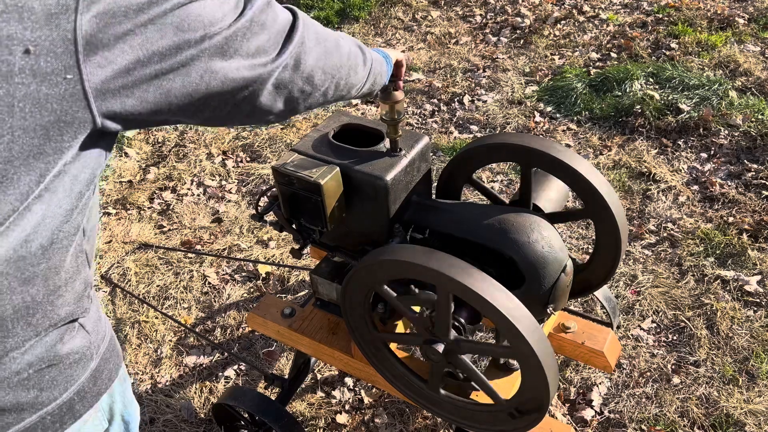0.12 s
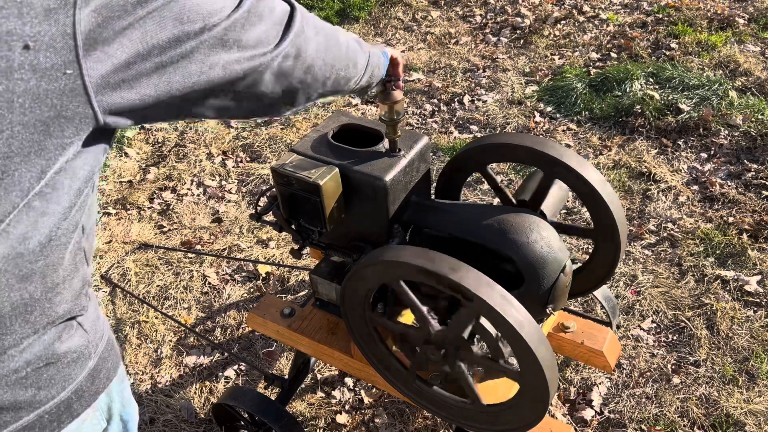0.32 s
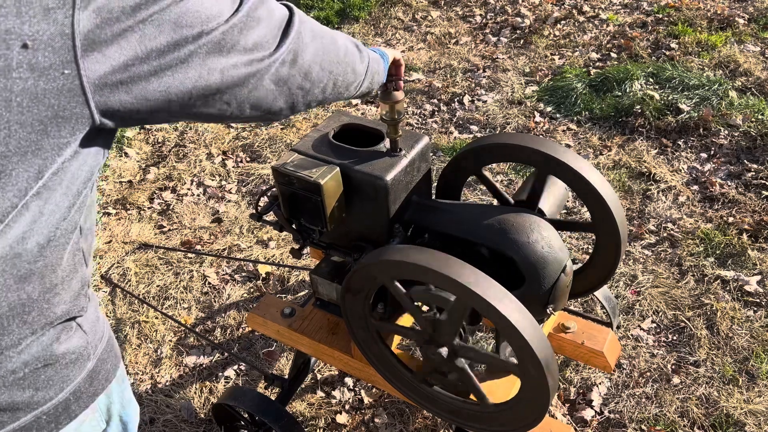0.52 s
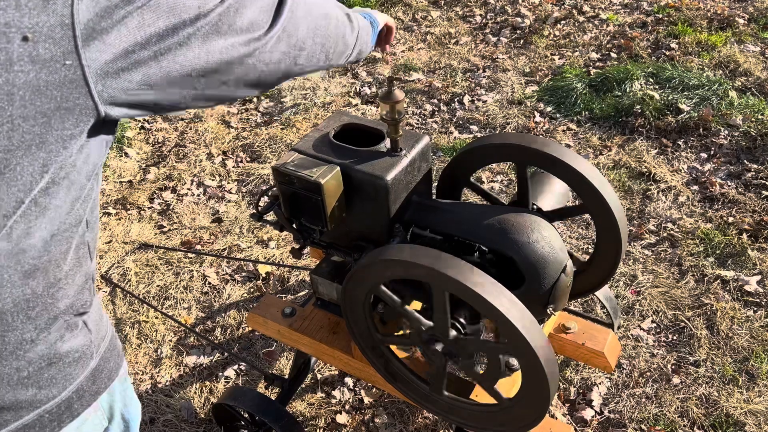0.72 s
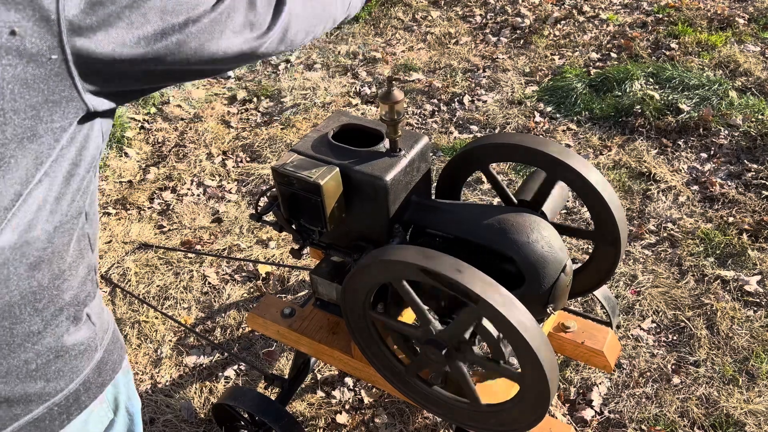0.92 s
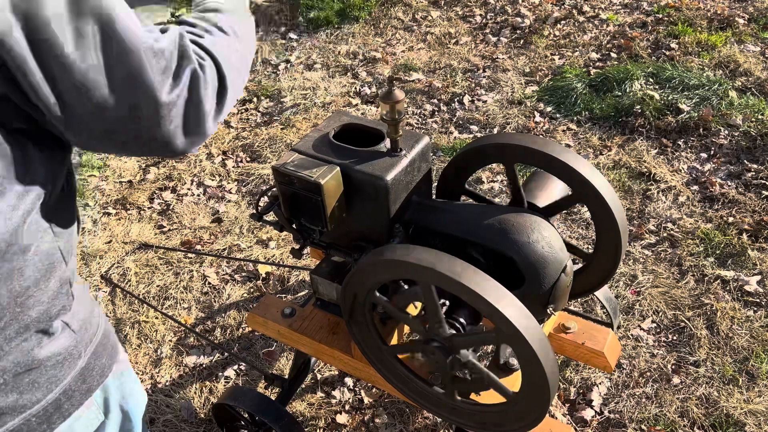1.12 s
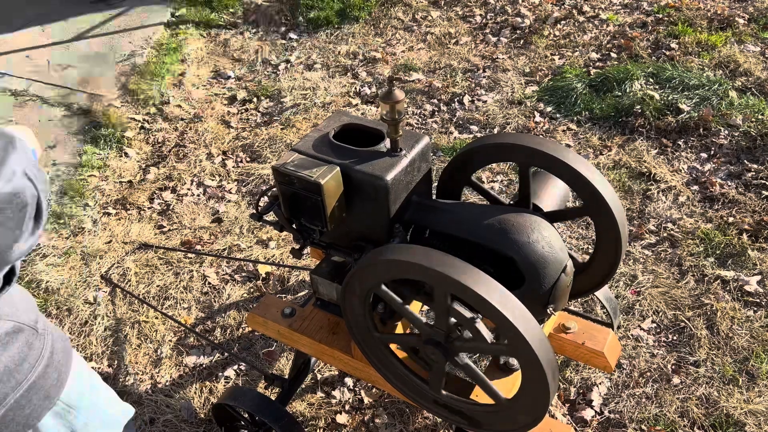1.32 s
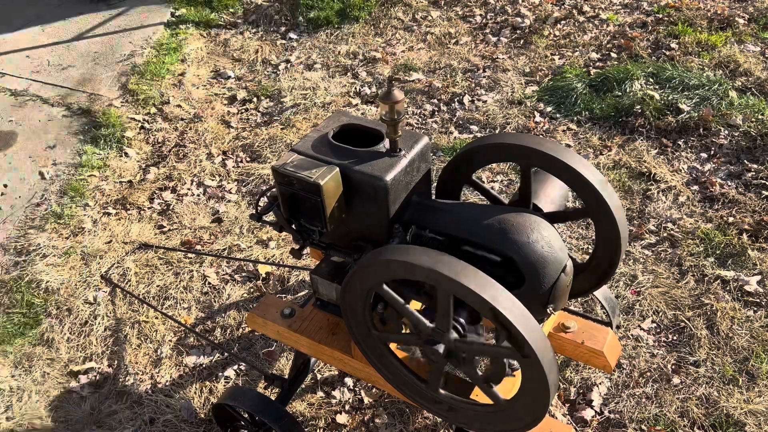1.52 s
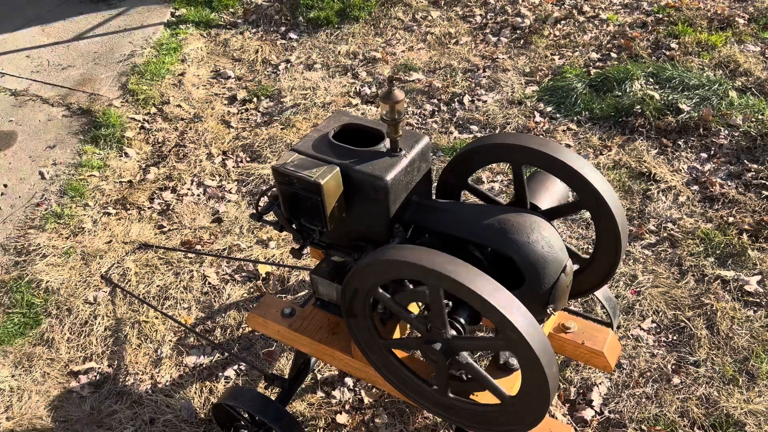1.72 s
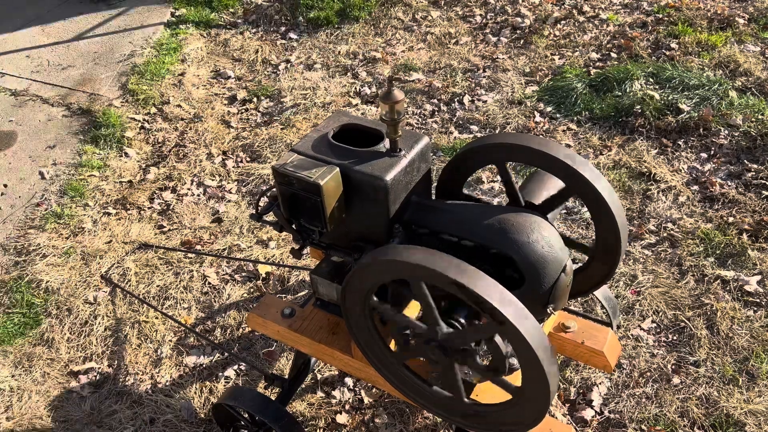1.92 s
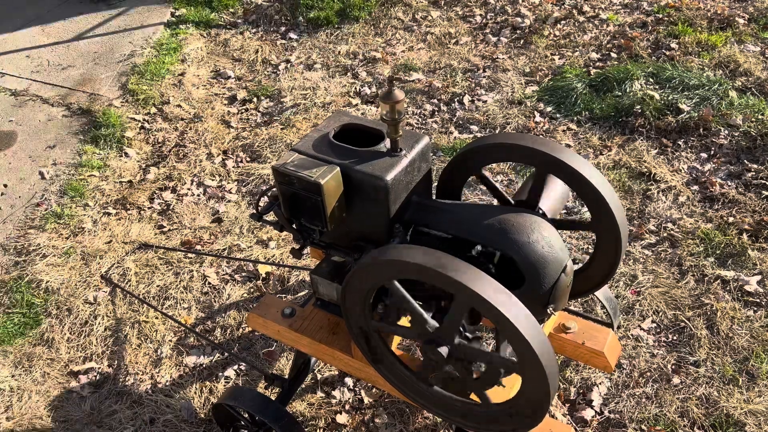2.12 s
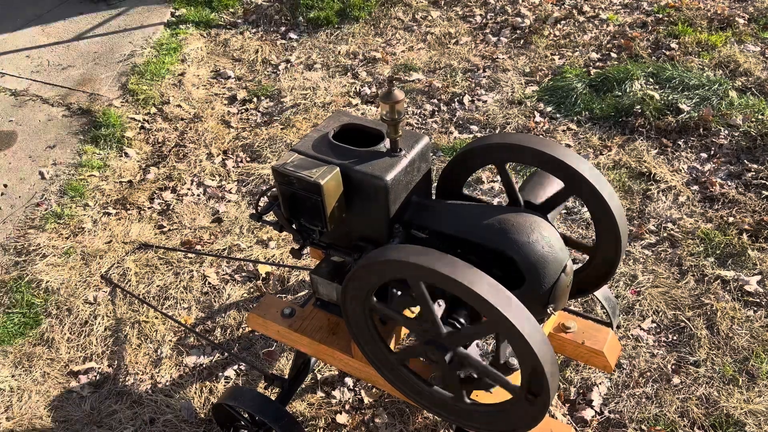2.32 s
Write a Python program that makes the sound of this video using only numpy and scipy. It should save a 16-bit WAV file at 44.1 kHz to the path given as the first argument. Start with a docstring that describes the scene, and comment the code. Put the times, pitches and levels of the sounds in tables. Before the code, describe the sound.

A small old single-cylinder engine runs outdoors, close to the microphone. It starts with an iron clatter, a gulp of air and a hiss, then fires one loud, sharp pop at about 0.3 seconds. From 0.4 seconds it coasts, with much quieter clatters, knocks, ticks and air puffs about four times a second over a faint whirr. After 1.6 seconds these grow softer and duller until about 2.4 seconds.

```python
"""A clatter of iron, a gulp of air, a hiss of compression, then one sharp, spitting pop: a small
hit-and-miss engine in an open yard, the microphone close above it. It coasts on at four turns a second:
gears and rod clatter and knock, air puffs through the open valve and the governor latch ticks, while
the treble dulls. Behind it are the whirr of the bearings, faint echoes and light wind on the microphone."""
import sys
import numpy as np
from scipy import signal
from scipy.io import wavfile
from scipy.ndimage import uniform_filter1d

SR = 44100
rng = np.random.default_rng(int(sys.argv[2]) if len(sys.argv) > 2 else 0)


def dump_mix(stems):
    """Bounce the given channels to the path in sys.argv[1] as a 16-bit WAV at rate SR."""
    frames = np.atleast_2d(stems).T  # one column per channel
    limited = np.clip(frames, -1, 1)  # hard clip at full scale
    pcm = np.round(limited * 32767).astype(np.int16)
    wavfile.write(sys.argv[1], SR, pcm)


N = 105840
TIME = np.arange(N) / SR

# gas flows of the working stroke (t/s, level/dB)
INTAKE_FLOW = [(.075, -79.5), (.1, -41.5), (.116, -36), (.125, -24), (.134, -30), (.15, -28.5), (.167, -45),
               (.2, -73)]
LEAK_FLOW = [(.16, -50), (.172, -35), (.2, -36), (.212, -31), (.216, -22), (.224, -23), (.229, -13),
             (.236, -14), (.244, -24), (.262, -38), (.275, -55)]
BLAST_FLOW = [(.263, -48.5), (.268, -23), (.274, -18), (.279, -8), (.286, -15), (.291, -20.5), (.31, -30.5),
              (.327, -35), (.345, -46), (.38, -53), (.42, -83)]
EXHAUST_FLOW = [(.264, -47), (.272, -27), (.28, -39), (.285, -20), (.292, -25), (.309, -32.5), (.322, -31),
                (.34, -41), (.37, -50.5), (.41, -70)]
# spectra of the moving gas at close range (f/Hz, relative level/dB)
INTAKE_SPECTRUM = [(40, 9), (130, 1.5), (250, 6.5), (900, -14.5), (1400, -6), (2000, 3.5), (3200, -8),
                   (4600, 3.5), (5300, -2.5), (6500, -3), (10000, -1.5), (13000, -1.5), (16000, -7.5)]
LEAK_SPECTRUM = [(100, -21), (500, -13.5), (750, -4), (1300, -4), (1850, 2.5), (2500, 4.5), (3100, -7.5),
                 (4100, 2.5), (5000, -6.5), (6400, 2.5), (7500, 0), (10200, 4), (13000, 1.5), (16000, -4)]
BLAST_SPECTRUM = [(200, -37.5), (1000, -1), (2200, -22), (3000, -13.5), (3800, -8.5), (4800, -12.5),
                  (6500, -5.5), (7500, -15.5), (9000, -3.5), (12000, -2.5), (13500, -5.5), (14500, -3.5),
                  (16000, -12)]
EXHAUST_SPECTRUM = [(30, -1.5), (110, 1), (210, -2.5), (400, -8), (650, 6), (850, -4), (1030, 3.5),
                    (1300, -5), (1700, 1.5), (2200, 2.5), (2900, -11.5), (3700, -6.5), (6000, -34),
                    (16000, -46.5)]
PUFF_SPECTRUM = [(60, -23), (180, -20), (300, 5.5), (420, -3), (530, 3.5), (700, -6.5), (1000, -12),
                 (1500, -26.5), (2500, -28), (4000, -35.5), (16000, -65)]
RUMBLE_SPECTRUM = [(20, -6), (50, 2), (100, -8), (160, -4), (300, -27), (1000, -59.5)]
VALVE_SPECTRUM = [(1000, -31), (2700, -2.5), (3600, -1), (5300, -12), (6500, 5.5), (9000, 8),
                  (11000, 5.5), (16000, -1)]
# pressure steps: intake valve flutter, ignition, exhaust, after-beats (t/s, level/dB, f/Hz, t60/s)
THUMPS = [(.068, -39, 300, 0.11), (.088, -33, 354, 0.1), (.107, -28.5, 449, 0.045),
          (0.123, -31, 472, 0.053), (.171, -42, 260, .1), (.2668, -14.5, 510, .011),
          (.283, -11, 604, 0.042), (.288, -22.5, 405, 0.092), (.313, -23, 410, 0.046),
          (0.322, -25, 320, 0.053)]
# gear and rod clatter, once a turn (t/s, rattle/dB, casting ring/dB, body hum/dB)
CLATTERS = [(.010, -38.5, -37.5, -39.5), (0.499, -46.5, -45, -40.5), (0.737, -39, -44.5, -42.5),
            (0.972, -46.5, -49, -40.5), (1.213, -41.5, -44.5, -37), (1.46, -39, -41.5, -44),
            (1.711, -47.5, -53, -49), (1.966, -47.5, -54, -48.5), (2.232, -48, -55.5, -63)]
# knocks of the rod bearing (t/s, level/dB)
KNOCKS = [(0.058, -44), (.548, -40.5), (.779, -35), (1.017, -42.5), (1.26, -41), (1.506, -35.5),
          (1.761, -41.5), (2.015, -43), (2.038, -49), (2.277, -44.5), (2.298, -60)]
# loose iron parts singing out (t/s, level/dB, f/Hz, t60/s)
PART_RINGS = [(.03, -38, 1610, 0.14), (0.997, -38, 1215, 0.15), (.779, -50, 4950, 0.16),
              (.893, -47, 6230, 0.18), (1.256, -43.5, 4820, 0.079), (1.382, -52.5, 4460, 0.088),
              (1.466, -47, 2790, 0.12), (1.491, -40.5, 4820, .14), (1.527, -47, 1204, .08),
              (1.581, -47.5, 2010, 0.13), (1.718, -46, 1780, 0.11), (1.724, -46.5, 4860, .12),
              (1.775, -64, 3360, 0.23), (1.888, -58, 6200, .14), (1.975, -55, 3450, 0.28),
              (2.117, -62, 3150, .25), (2.236, -45, 3926, 0.11), (2.278, -47.5, 1414, 0.05)]
# air through the open valve (peak t/s, level/dB, hollow tone f/Hz, whistle/dB)
PUFFS = [(0.444, -42.5, 485.3, -47.5), (0.669, -38, 312.9, -44), (0.907, -37.5, 645, -44),
         (1.145, -39.5, 320.4, -48.5), (1.395, -39, 338.3, -50.5), (1.646, -43, 323.8, -50.5),
         (1.897, -45, 330, -54), (2.158, -49.5, 442.6, -57.5)]
# whistles of the valve (f/Hz, width/Hz, relative level/dB)
VALVE_WHISTLES = [(4840, 92, -13), (6230, 180, -9.5), (6620, 94, -14), (7350, 360, -10.5),
                  (9810, 150, -5.5), (10500, 73, -16), (12500, 320, -11.5)]
# governor latch and push rod (t/s, scrape/dB, ring/dB)
TICKS = [(0.377, -48, -49.5), (.492, -41.5, -53), (0.607, -46.5, -54), (.724, -43, -54), (.841, -46.5, -63),
         (.960, -45.5, -48.5), (1.079, -51.5, -58), (1.2, -52.5, -69), (1.323, -55, -58), (1.446, -45, -50),
         (1.570, -46.5, -52.5), (1.581, -63, -50), (1.698, -46.5, -40), (1.713, -42.5, -44),
         (1.827, -51, -47.5), (1.843, -60, -56), (1.856, -54, -56), (1.956, -52, -54.5), (2.076, -52, -64),
         (2.094, -51.5, -58), (2.215, -53, -67), (2.352, -60, -78)]
# modes of the iron casting and the steel latch (f/Hz, relative level/dB, t60/s)
CASTING_MODES = [(702, -2.5, 0.041), (758, -11, .1), (1110, -18, 0.039), (1228, 14, 0.26), (1599, 13, 0.19),
                 (1810, -11.5, .08), (2306, 4.5, 0.18), (2790, 8.5, 0.11), (3480, -19, .1), (3993, 6, .06),
                 (5110, 2.5, 0.17), (5010, -7, 0.18), (8540, 6.5, 0.028), (9680, -2, .1)]
LATCH_MODES = [(8190, 3.5, 0.081), (8230, 6, .06), (5900, -3, 0.044), (9200, -9, .04)]
# spectra of the metal parts at close range (f/Hz, relative level/dB)
RATTLE_SPECTRUM = [(150, -37), (500, 10.5), (800, 3.5), (1500, 0), (2400, 3), (3800, 1), (5200, 2),
                   (7000, -9.5), (8700, -5), (11000, -10), (16000, -19.5)]
BODY_SPECTRUM = [(80, -48), (200, -24), (320, -1), (520, -15.5), (760, 14), (1000, 0), (1220, 6),
                 (1400, -3.5), (1650, 0.5), (2200, -12.5), (4000, -42), (9000, -35), (16000, -44)]
KNOCK_SPECTRUM = [(100, -20), (300, 11.5), (550, 11.5), (900, -4), (1400, 4), (2000, -10.5), (2800, 2.5),
                  (4000, -14), (4900, -4.5), (6500, -18.5), (10000, -20.5), (16000, -18.5)]
TICK_SPECTRUM = [(300, -33), (1000, -4), (1900, 12.5), (2800, -2), (4000, 9.5), (5700, 10), (7000, 1.5),
                 (8800, 9), (11000, 3), (16000, -4.5)]
BEARING_SPECTRUM = [(15, -65.5), (25, -29.5), (145, -14), (293, -3), (516, -3.5), (624, -4), (677, -3.5),
                    (1230, -14.5), (1330, -13.5), (1610, -14), (3620, -27), (4870, -24.5), (7510, -22.5),
                    (8360, -27), (16000, -29.5)]
# whirr of bearings and flywheels (t/s, level/dB)
BEARING_LEVEL = [(0, -49), (.5, -50), (1.1, -54.5), (1.6, -52.5), (2.1, -57.5), (2.4, -60)]
# wind bumps on the microphone (t/s, level/dB)
WIND_BUMPS = [(.665, -61), (2.185, -57), (2.38, -63)]
# spectra of the yard's echoes and the wind (f/Hz, relative level/dB)
YARD_SPECTRUM = [(100, 5), (1000, -7.5), (4000, 2.5), (16000, -40.5)]
WIND_SPECTRUM = [(20, 5.5), (55, -20), (110, -10), (300, -29), (1000, -60)]
# treble of the whole scene (t/s, gain/dB)
TREBLE_GAIN = [(0, 1), (1.55, 0.5), (1.9, -7), (2.15, -6.5), (2.4, -13.5)]

METAL_RIPPLE_DB, GAS_RIPPLE_DB = 5, 2.5


def firing():
    """The charge fires: a blast with a shrill jet of gas, then the exhaust barks through the muffler."""
    jet = amp(-8.5) * swell(.275, rise=.003, fall=.003) * whistle(hz=13350, width_hz=600)
    blast = colour(level(BLAST_FLOW) * noise(), BLAST_SPECTRUM, GAS_RIPPLE_DB)
    exhaust = colour(level(EXHAUST_FLOW) * noise(), EXHAUST_SPECTRUM)
    rumble = amp(-28.5) * colour(swell(.285, rise=.008, fall=.011) * noise(), RUMBLE_SPECTRUM)
    return jet + blast + exhaust + rumble


def charge():
    """Air is sucked in, then hisses and squeals past the piston as it is compressed."""
    squeal = amp(-23) * burst(.235, rise=.0018, hold=.002, t60=.085) * tone(hz=1830, waver_hz=90)
    intake = colour(level(INTAKE_FLOW) * noise(), INTAKE_SPECTRUM, GAS_RIPPLE_DB)
    leak = colour(level(LEAK_FLOW) * noise(), LEAK_SPECTRUM, GAS_RIPPLE_DB)
    return intake + leak + squeal


def thumps():
    """Each pressure step rings the gas passages for a few cycles."""
    return -sum(amp(db) * burst(s, rise=.0021, hold=0, t60=t60) * np.sin(2 * np.pi * hz * (TIME - s))
                for s, db, hz, t60 in THUMPS)


def gear_clatter():
    """Just below the microphone, gear teeth rattle, ring the casting and set the body humming."""
    rise_s = .003
    rattle_level, ring_level, hum_level = np.zeros((3, N))
    for s, rattle_db, ring_db, hum_db in CLATTERS:
        shape = burst(s, rise_s, hold=.013, t60=.17)
        rattle_level += amp(rattle_db) * shape
        ring_level += amp(ring_db) * shape
        onset = np.clip((TIME - s) / rise_s, 0, 1)
        hum_level += amp(hum_db) * swell(s + .042, rise=.025, fall=.028) * onset
    teeth = impacts() * judder(depth_db=3.5)
    rattle = colour(rattle_level * teeth, RATTLE_SPECTRUM, METAL_RIPPLE_DB)
    hum = colour(hum_level * impacts(), BODY_SPECTRUM, METAL_RIPPLE_DB)
    casting = convolve(ring_level * teeth, ring(CASTING_MODES))
    return rattle + hum + casting


def rod_knocks():
    """The rod bearing takes up its slack: a short dull knock within each clatter."""
    blows = sum(amp(db) * burst(s, rise=.00067, hold=.0021, t60=.094) for s, db in KNOCKS)
    return colour(blows * noise(), KNOCK_SPECTRUM, METAL_RIPPLE_DB)


def valve_puffs():
    """The piston pushes air through the open valve: a hollow puff with whistles that arch in pitch."""
    lead_s, width_s, arch = .0063, .012, .006  # the whistles peak just ahead of the puff
    hollow, flow, whistle_level = np.zeros((3, N))
    for s, db, hz, whistle_db in PUFFS:
        shape = amp(db) * swell(s, rise=.013, fall=.019)
        flow += shape
        whistle_level += amp(whistle_db) * swell(s - lead_s, width_s, width_s)
        hollow += amp(-4) * shape * tone(hz, waver_hz=35.24)
    peaks = np.array([row[0] for row in PUFFS]) - lead_s
    widths_from_peak = abs(TIME - peaks[:, None]).min(0) / width_s
    bend = 1 - arch * np.minimum(widths_from_peak, 2) ** 2
    whistles = sum(amp(db) * whistle(hz * bend, width_hz) for hz, width_hz, db in VALVE_WHISTLES)
    hiss = amp(-6) * colour(noise(), VALVE_SPECTRUM, METAL_RIPPLE_DB)
    return hollow + colour(flow * noise(), PUFF_SPECTRUM) + whistle_level * (whistles + hiss)


def latch_ticks():
    """The governor latch scrapes briefly and its steel rings, a little differently each time."""
    ring_rise_s = .0042
    scrape_level, ringing = np.zeros((2, N))
    for s, scrape_db, ring_db in TICKS:
        scrape_level += amp(scrape_db) * burst(s, rise=.0025, hold=.0025, t60=.041)
        steel = ring([(hz * rng.uniform(.992, 1.008), db + rng.uniform(-3, 3), t60)
                      for hz, db, t60 in LATCH_MODES])
        steel *= np.minimum(TIME[:len(steel)] / ring_rise_s, 1)
        slot = ringing[round(s * SR):][:len(steel)]
        slot += amp(ring_db) * steel[:len(slot)]
    scrape = colour(scrape_level * noise(), TICK_SPECTRUM, METAL_RIPPLE_DB)
    return scrape + ringing * judder(depth_db=4)


def loose_parts():
    """Single iron parts ring unevenly above the clatter."""
    rings = (amp(db) * burst(s, rise=.0019, hold=.0049, t60=t60) * tone(hz, waver_hz=34.66)
             for s, db, hz, t60 in PART_RINGS)
    return judder(depth_db=4) * sum(rings)


def bearings():
    """Bearings and flywheels whirr underneath, slowly fading."""
    return level(BEARING_LEVEL) * colour(noise(), BEARING_SPECTRUM, METAL_RIPPLE_DB)


def yard_echoes(engine):
    """The ground and the yard scatter faint echoes back to the microphone."""
    tail = (noise() * burst(start=.015, rise=.005, hold=0, t60=.083))[:SR]
    return amp(-22.5) * colour(convolve(engine, tail), YARD_SPECTRUM)


def wind():
    """Light air bumps the microphone."""
    gusts = sum(amp(db) * swell(s, rise=.04, fall=.04) for s, db in WIND_BUMPS)
    return gusts * colour(noise(), WIND_SPECTRUM)


def amp(db):
    """Decibels to gain."""
    return 10 ** (np.asarray(db) / 20)


def unit(x):
    """Scales to rms 1."""
    return x / np.sqrt(np.mean(x ** 2) + 1e-20)


def noise():
    """White noise."""
    return rng.standard_normal(N)


def level(points):
    """Gain along a (t/s, level/dB) curve, silent outside it."""
    return amp(np.interp(TIME, *np.transpose(points), left=-np.inf, right=-np.inf))


def burst(start, rise, hold, t60):
    """Attack, hold and exponential release; times in seconds."""
    t = TIME - start
    return np.clip(t / rise, 0, 1) * amp(-60 * np.maximum(t - rise - hold, 0) / t60)


def swell(peak, rise, fall):
    """A rounded hump with exponential skirts; times in seconds."""
    t = TIME - peak
    return np.exp(1 - np.sqrt(1 + 2 * (t / np.where(t < 0, rise, fall)) ** 2))


def convolve(x, response):
    """Passes x through an impulse response scaled to unit energy."""
    return signal.oaconvolve(x, response / np.linalg.norm(response))[:N]


def colour(x, spectrum, ripple_db=0, ripple_hz=55.03, size=4096):
    """Causal filter of unit power gain with the given spectrum; ripple adds many small resonances."""
    hz, db = np.transpose(spectrum)
    f = abs(np.fft.fftfreq(size, 1 / SR))
    ripple = np.interp(f / ripple_hz, np.arange(size), np.clip(rng.standard_normal(size), -2, 2))
    gain = amp(np.interp(np.log(f + 1), np.log(hz), db) + ripple_db * ripple * f / (f + 1000))
    minimum_phase = np.exp(np.conj(signal.hilbert(np.log(gain))))
    return convolve(x, np.fft.ifft(minimum_phase).real[:size // 2])


def whistle(hz, width_hz):
    """Noise in one steep resonance that can move."""
    pole = np.exp(-np.pi * width_hz / SR)
    narrow_band = signal.lfilter([1], [1, -2 * pole, pole * pole], noise() + 1j * noise())
    carrier = np.exp(2j * np.pi * np.cumsum(hz * np.ones(N)) / SR)
    return unit((narrow_band * carrier).real)


def tone(hz, waver_hz):
    """A sine of rms 1 whose pitch wavers."""
    drift = unit(uniform_filter1d(noise(), size=256))
    return np.sqrt(2) * np.sin(2 * np.pi * np.cumsum(hz + waver_hz * drift) / SR)


def ring(modes):
    """The sound of one blow on a set of modes."""
    t = TIME[:SR // 4]
    return sum(amp(db - 60 * t / t60) * np.sin(2 * np.pi * hz * t) for hz, db, t60 in modes)


def impacts(per_second=3000, spread_db=2.5):
    """A dense train of small metal contacts of uneven size."""
    size = amp(spread_db * np.minimum(rng.exponential(1, N), 4))
    return unit(size * np.sign(noise()) * (rng.random(N) < per_second / SR))


def judder(depth_db):
    """Loose parts chatter: the level jumps every few milliseconds."""
    flicker = unit(uniform_filter1d(noise(), size=200))
    return unit(amp(depth_db * np.clip(flicker, -2, 2)))


def scene():
    """The engine in the yard, on one microphone close above; the treble dulls as it coasts."""
    treble_from_hz = 7500
    whirr = bearings()
    engine = gear_clatter() + rod_knocks() + loose_parts() + valve_puffs() + latch_ticks()
    engine += charge() + firing() + thumps()
    mix = engine + yard_echoes(engine) + whirr + wind()
    treble = signal.sosfiltfilt(signal.butter(2, treble_from_hz, "high", fs=SR, output="sos"), mix)
    return (mix + (level(TREBLE_GAIN) - 1) * treble)[None]


def record(dry):
    """The recorder rounds off peaks at full scale and cuts the highest treble."""
    cutoff_hz = 16050
    rounded = dry / (1 + dry ** 6) ** (1 / 6)
    lowpass = signal.firwin(511, cutoff_hz, window=("kaiser", 9), fs=SR)
    return signal.oaconvolve(rounded, lowpass[None], "same")


dry = scene()
out = record(dry)
dump_mix(out)
```